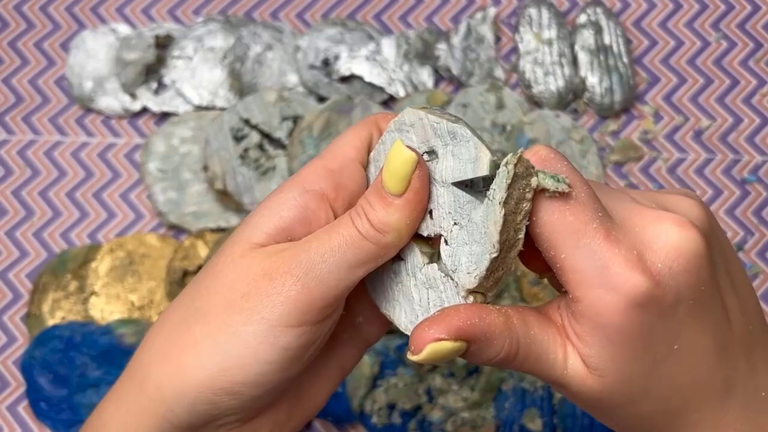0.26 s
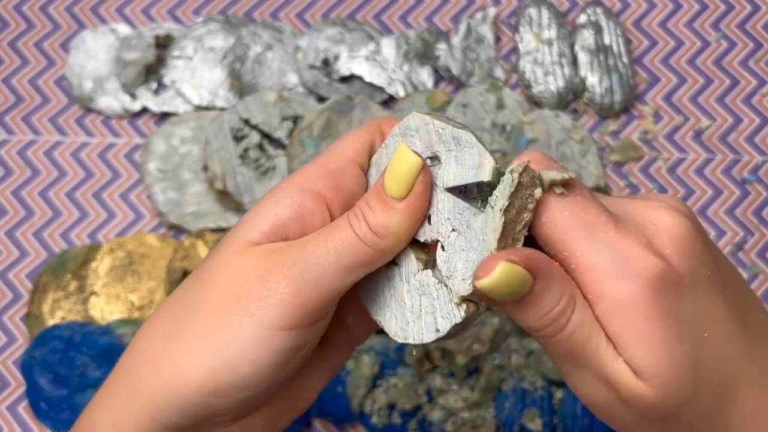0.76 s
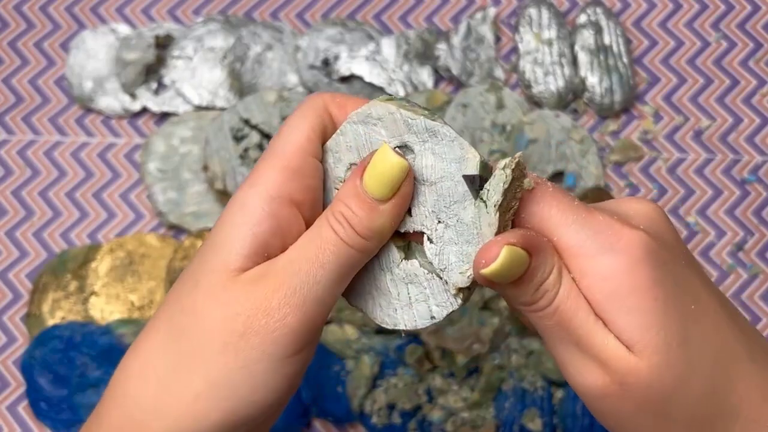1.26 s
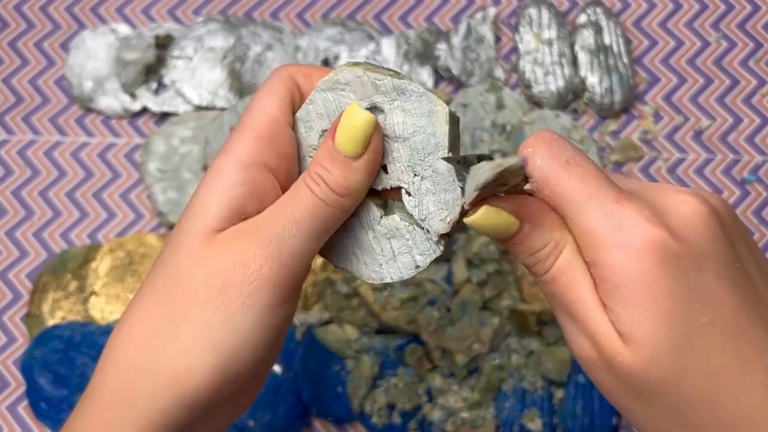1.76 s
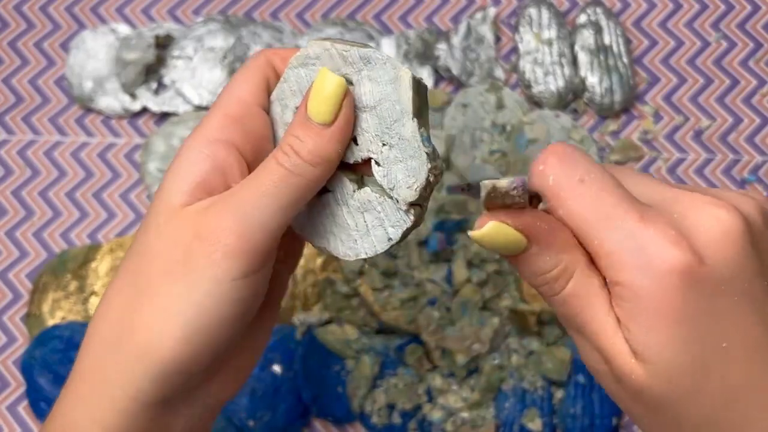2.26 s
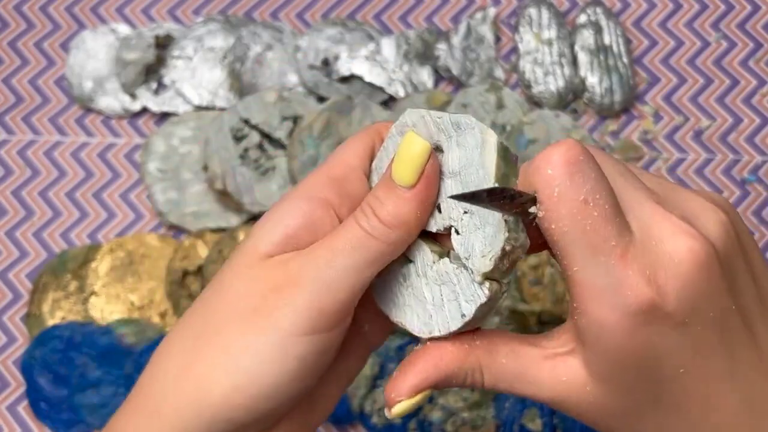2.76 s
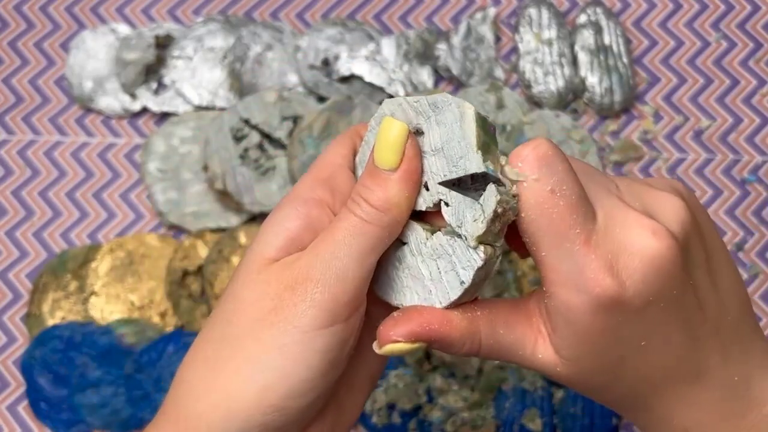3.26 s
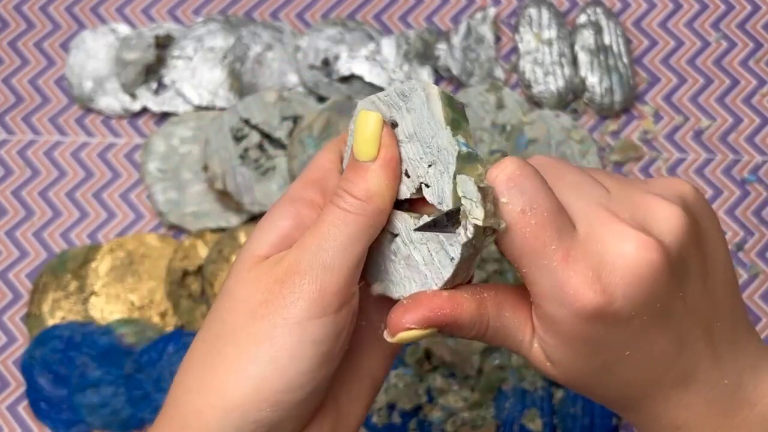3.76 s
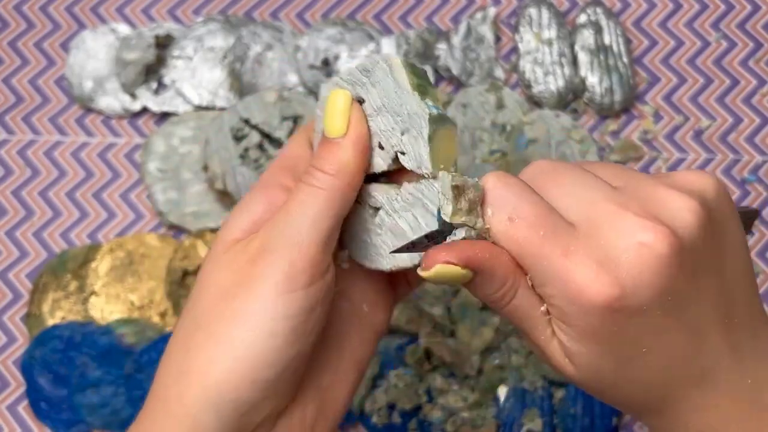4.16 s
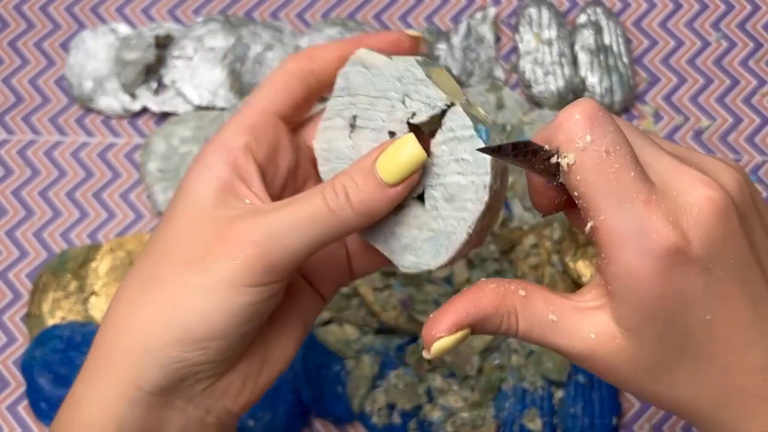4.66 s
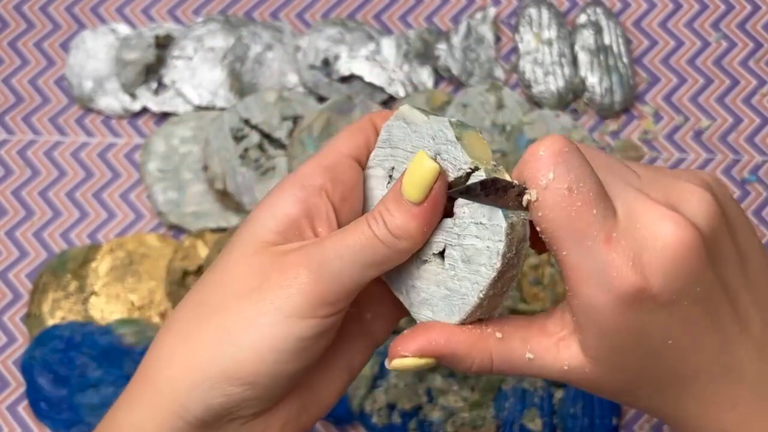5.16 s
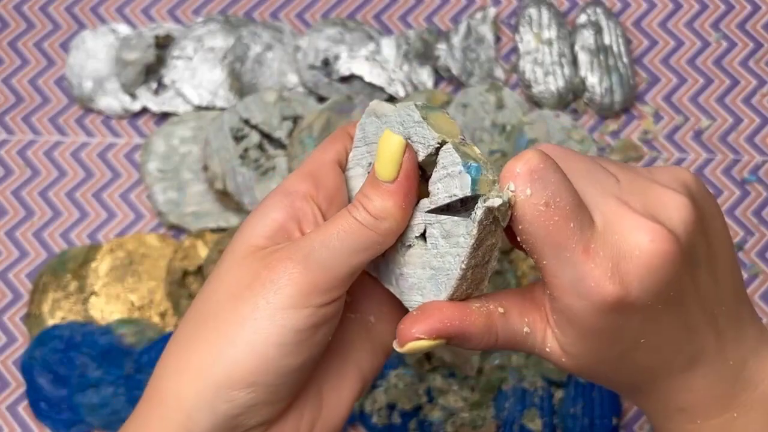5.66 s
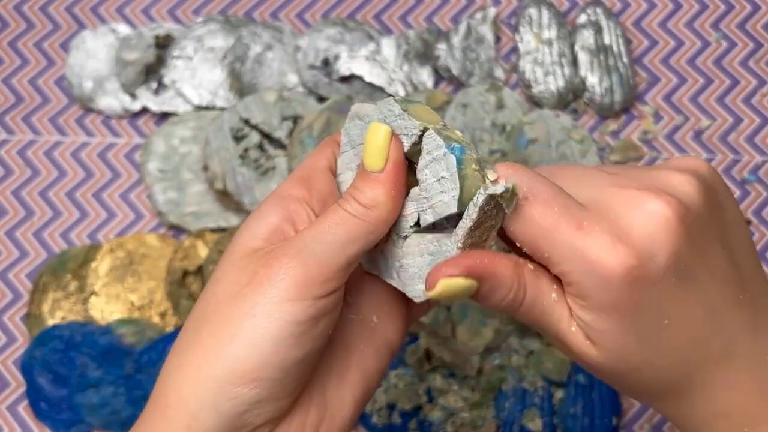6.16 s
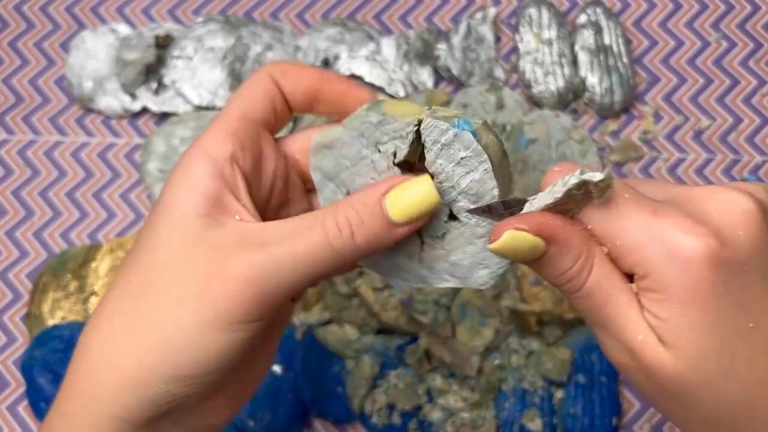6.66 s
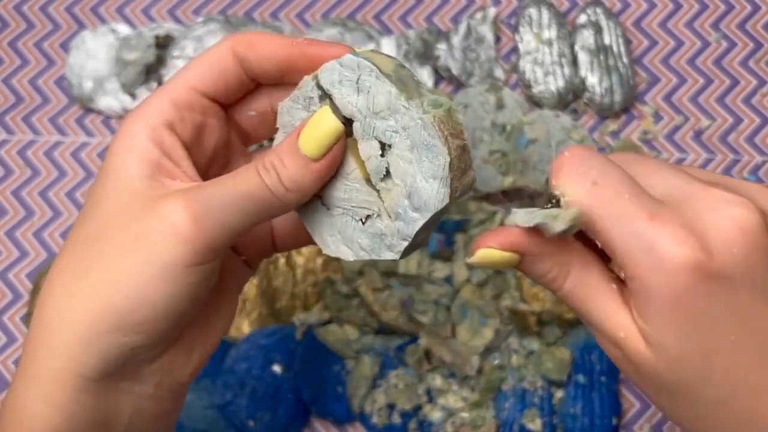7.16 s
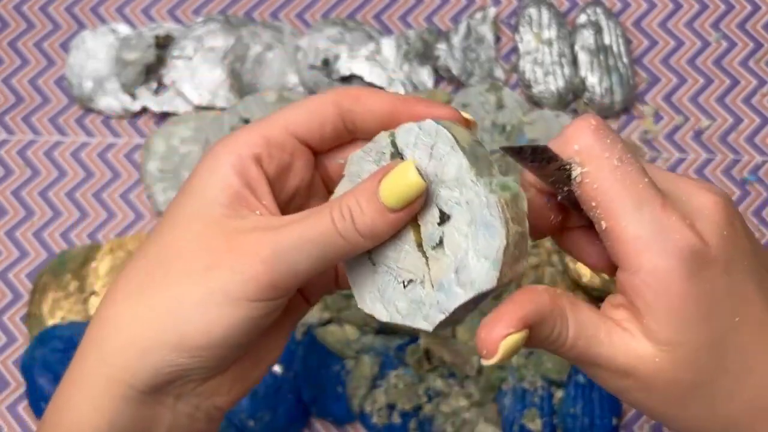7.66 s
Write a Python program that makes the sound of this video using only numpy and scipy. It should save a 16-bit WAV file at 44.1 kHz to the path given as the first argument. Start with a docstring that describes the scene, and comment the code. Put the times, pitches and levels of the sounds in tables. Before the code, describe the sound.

Close stereo pickup of a blade carving hard dry soap in a small room. A faint start, then a loud crisp snap, a run of small crackles and another hard crack with a knock. Ticks lead to the densest, loudest crunch past four seconds, then a calmer stretch, then more snaps and gritty crumbling. Faint low rumble and distant noise underneath.

```python
"""A small blade carves a hard dry bar of soap close to a stereo microphone pair in a small room.
The soap hisses under the blade (gritty filtered noise) and snaps as flakes break (ringing noise bursts);
chunks and hands knock on the table (bursts through its modes, rattles, thumps) and narrow rustles swell.
Distant traffic-like noise, table rumble, a low drone and two short low hums lie underneath."""
import sys
import numpy as np
from scipy import signal
from scipy.fft import rfft, irfft, next_fast_len
from scipy.io import wavfile
from scipy.ndimage import uniform_filter1d

SR = 44100
rng = np.random.default_rng(int(sys.argv[2]) if len(sys.argv) > 2 else 0)


def inscribe(sig):
    """Save sig as 16-bit PCM at rate SR to the path in sys.argv[1].

    A 1-D sig is mono; a 2-D sig holds one channel per row.
    Samples are clipped to [-1, 1] before scaling.
    """
    pcm = np.round(np.clip(np.atleast_2d(sig).T, -1, 1) * 32767)
    wavfile.write(sys.argv[1], SR, pcm.astype(np.int16))


N = 348257
LAG_MS = 1.5  # slow bending waves: a mode at 1 kHz arrives this late, lower ones later
STROKE_EDGE_DB = -13  # level at the ends of a stroke or rustle, relative to its middle


def rubbing():
    """A gritty hiss, a duller scrape and a fizz follow the strokes, partly with grains of their own."""
    # colour of the hiss under the blade (f/Hz, level/dB)
    hiss_colour = [(1500, -14), (2500, -7), (4300, 0), (5500, -2), (6200, -5), (7000, -10), (8000, -20),
                   (11800, -40)]
    # colour of the duller scrape (f/Hz, level/dB)
    scrape_colour = [(150, -10), (400, 5.5), (900, -0.5), (1500, -0.5), (2150, 0), (2700, 0.5), (3300, 0),
                     (6000, -28)]
    # colour of the fizz on top (f/Hz, level/dB)
    fizz_colour = [(5000, -47.5), (6500, 8.5), (7500, 11), (10500, 6.5), (11800, 4), (12400, -26.5)]
    crumb_share, crumb_full_db = .25, -42  # largest share of power in crumbs, reached at this level
    shared_grit, bits = grit(), crumbs()
    # each colour starts with a deep cut below its table
    colours = [(300, -26.0)] + hiss_colour, [(40, -38)] + scrape_colour, [(300, -87.5)] + fizz_colour
    out = 0
    for level, points in zip(strokes(), colours):
        noise = rng.standard_normal((2, N)) * (0.29 * shared_grit + 0.78 * grit())
        share = crumb_share * np.minimum(level / gain_of(crumb_full_db), 1)
        hiss = np.sqrt(1 - share) * evened(colour(noise, points))
        crumbling = np.sqrt(share) * evened(colour(bits, points))
        out = out + level * (hiss + crumbling)
    return out


def strokes():
    """Levels of hiss, scrape and fizz: showers start fast and fade, strokes swell and sink; powers add."""
    # hands at rest, always present (hiss/dB, scrape/dB, fizz/dB)
    rest_db = (-66.5, -61.5, -64)
    # crumbs showering after a break (t/s, level/dB, scrape re hiss/dB, fizz re hiss/dB)
    showers = [(1.20, -63.5, 14, 21), (1.431, -31, -18, -2.5), (1.70, -37, -12, 3), (1.852, -35.5, 9, -6.5),
               (2.643, -31, -2, -6), (3.249, -44.5, -4, -12), (3.477, -37, -13, -8),
               (3.629, -52.5, 9, -12.5), (3.745, -38, -11, -2.5), (3.97, -37, -22, -7),
               (4.247, -29, -15, 4), (4.275, -24.5, -27, -0.5), (4.40, -34.5, -13, 0),
               (4.664, -53.5, -13.5, 6.5), (5.34, -50, -3, -2), (5.506, -45.5, 3, 2.5),
               (5.746, -42.5, -0.5, 4.5), (6.043, -47.5, -10, -2), (6.32, -26.5, -11, -1.5),
               (6.639, -31.5, -15, 0.5), (6.97, -36.5, -0.5, -5), (7.522, -37, -0.5, -2), (7.72, -49, 2, 8)]
    # soft strokes of blade and fingers (middle t/s, length/s, level/dB, scrape re hiss/dB, fizz re hiss/dB)
    soft_strokes = [(0.0, 0.063, -57, -8, 8), (0.25, 0.12, -56, 1, 4), (0.627, 0.16, -42.5, -13, -2),
                    (0.756, 0.24, -51, -17, 0), (1.5, 0.06, -49, -20, -7), (0.95, 0.12, -62.5, -14, 12.5),
                    (1.784, 0.19, -36.5, -11.5, 1), (2.072, 0.16, -47.5, -3, 0),
                    (2.153, 0.42, -59, -8, -12), (2.258, 0.15, -68, -4, 14), (2.44, 0.034, -50, -4, 1),
                    (2.582, 0.41, -67, 8.5, 7), (2.969, 0.22, -48.5, -28, -4),
                    (3.889, 0.073, -44, -24, -10), (4.22, 0.36, -38.5, -12, -5.5),
                    (4.603, 0.2, -58, 7, -12), (4.977, 0.058, -51.5, -5.5, -5),
                    (5.286, 0.23, -53, -11, -0.5), (5.353, 0.043, -40.5, -9, -12),
                    (6.284, 0.26, -46, -12, 1.5), (6.6, 0.17, -33, -14.5, -2.5),
                    (6.927, 0.11, -42.5, -28, 4), (6.964, 0.066, -30.5, -11, 0),
                    (7.257, 0.12, -53, -18, 5.5), (7.465, 0.34, -63.5, 0, 5), (7.864, 0.24, -47, -4, 2)]
    rise_s = 0.004
    # a shower of big_db fades at this rate; each dB smaller fades faster
    fade_db_per_s, faster_per_db, big_db = 76.5, 2, -22
    t = np.arange(0, N + 64, 64) / SR  # coarse time steps
    power = gain_of(np.array(rest_db))[:, None] ** 2 * np.ones(len(t))
    for s, db, low_db, top_db in showers:
        after = np.maximum(t - s, 0)
        fade = max(fade_db_per_s + faster_per_db * (big_db - db), 10)
        shape = np.minimum(after / rise_s, 1) * gain_of(db - fade * after)
        power += (gain_of([[0], [low_db], [top_db]]) * shape) ** 2
    for s, length, db, low_db, top_db in soft_strokes:
        shape = gain_of(db + STROKE_EDGE_DB * (2 * (t - s) / length) ** 2)
        power += (gain_of([[0], [low_db], [top_db]]) * shape) ** 2
    return [np.interp(np.arange(N) / SR, t, np.sqrt(p)) for p in power]


def grit():
    """Grains of equal size, each crumbling for several milliseconds, over a steady contact."""
    grains_per_s, grit_db, crumble_s = 220, 9.5, 0.012
    starts = 1.0 * (rng.random(N) < grains_per_s / SR)
    grains = signal.lfilter([1], [1, -np.exp(-1 / (crumble_s * SR))], starts)
    return 1 + gain_of(grit_db) * evened(grains)


def crumbs():
    """Single crumbs breaking: short grains of sixteen pitches, slightly uneven, higher ones stronger."""
    per_s, spread_db, cycles = 1300, 0.5, 9.5
    out, pitches = np.zeros((2, N)), np.geomspace(300, 11500, num=16)
    size = gain_of(spread_db * np.minimum(rng.exponential(1, N), 3))
    size = size * (rng.random(N) < per_s / SR)
    which, sign = rng.integers(0, len(pitches), N), rng.choice([-1., 1.], (2, N))
    for k, hz in enumerate(pitches):
        u = np.arange(0, cycles, hz / SR)  # time in cycles
        grain = np.sin(np.pi * u / cycles) ** 2 * np.sin(2 * np.pi * u) * hz / 1000
        out += signal.oaconvolve(sign * size * (which == k), grain[None], axes=1)[:, :N]
    return evened(out)


def snaps():
    """Flakes breaking: each crack rings its flake briefly and sprays top treble."""
    # flakes breaking (t/s, level/dB, flake ring f/Hz, top treble re ring/dB, crack time scale/ms)
    breaks = [(1.1977, -17, 2960, 11.5, 2.1), (1.425, 1, 3560, 5.5, 2), (1.4285, -5, 4850, 1.5, 2.6),
              (1.4355, -13, 4900, 9, 3.8), (1.647, -26.5, 4700, 9, 3.5), (1.662, -25, 5000, 31, 2.7),
              (1.6836, -22.5, 2000, 13, 2.7), (1.692, -20, 4500, 8, 3), (1.7014, -15.5, 5000, 3, 3.7),
              (1.7172, -15.5, 4330, -10, 1.4), (1.7399, -14, 4250, 3, 1.8), (1.75, -19, 5130, -3, 2.9),
              (1.76, -14, 5130, 18, 1.7), (1.7918, -14, 3540, -15, 1.3), (1.8085, -24, 4800, 6, 1.5),
              (1.845, -15, 2480, -8, 2.4), (2.101, -26, 2770, 12, 4.9), (2.334, -41.5, 3200, 0, 8.4),
              (2.436, -31, 4730, -27, 1.5), (2.637, -4.5, 3620, -8, 1.6), (2.6402, 0.5, 3620, -1.5, 0.83),
              (3.2433, -14.5, 4800, 7.5, 3.3), (3.4746, -17, 3580, 9, 2.9), (3.5134, -21, 4670, 4, 2.4),
              (3.582, -17.5, 5600, -1, 5.5), (3.626, -23.5, 4300, 3, 8.7), (3.6527, -24, 3150, -21, 4.6),
              (3.744, -17, 2900, 6.5, 2.5), (3.8008, -30.5, 4050, -28, 5.2), (3.8739, -24.5, 3835, 5, 2.9),
              (3.9697, -5, 3810, -41, 2.2), (4.017, -26, 3527, -22, 3), (4.0729, -11.5, 4670, 2.5, 0.9),
              (4.166, -21.5, 3720, 5, 2), (4.184, -20, 5000, 5, 2.4), (4.22, 7.5, 4220, -3, 0.77),
              (4.2254, -11, 4350, 11, 4.4), (4.2476, -0.5, 3900, -11, 2.8), (4.2525, 2, 4140, -25, 1.8),
              (4.271, -2.5, 5550, -8, 3.8), (4.2762, -11, 4060, -18, 4.4), (4.282, -14.5, 5250, -4.5, 1.5),
              (4.293, -9, 4740, -18, 3.7), (4.3303, -18, 4100, -20, 2.6), (4.3384, -1.5, 4960, 5.5, 1.1),
              (4.394, -2, 5320, -43, 2.35), (4.4263, -16.5, 4170, -29, 5.3), (4.475, -15.5, 5600, -9, 3.8),
              (4.659, -27, 5200, 6.5, 2.7), (5.3443, -27, 5100, 6, 6.1), (5.5041, -19.5, 5440, 6.5, 3.8),
              (5.5392, -22.5, 4600, 29, 3), (5.7459, -12.5, 4920, 4.5, 3.3), (6.049, -18.5, 4960, 8.5, 1.2),
              (6.173, -29.5, 5000, 16.5, 1.8), (6.2944, -13.5, 3670, 3.5, 1.8), (6.31, -16, 4640, 5, 5.6),
              (6.3206, -12, 4970, 21, 2.7), (6.324, -13, 5130, -11, 2.7), (6.343, -26, 5000, -8, 3.4),
              (6.39, -21, 4900, 2, 6), (6.429, -24, 4050, -10, 3), (6.531, -30, 4160, -10, 2.2),
              (6.5523, -17, 5000, 4, 2), (6.6348, -6.5, 3770, 0, 0.91), (6.638, -17, 4700, -5, 3),
              (6.669, -16.5, 4730, 2.5, 3.8), (6.677, -29, 3500, 9, 1.4), (6.794, -28, 5070, 8, 4.9),
              (6.919, -20, 5000, 6, 3.6), (6.9586, -19.5, 2850, 4, 7.5), (7.452, -32.5, 5700, -28, 7.3),
              (7.5274, -21.5, 3450, 6, 9.8), (7.25, -40, 3500, -8, 6.6), (7.6226, -26, 2960, 2, 4),
              (7.681, -33, 2550, 10, 2.6), (7.7198, -6, 5380, -22, 2.3), (7.781, -14, 5730, -37, 3.9),
              (7.787, -34, 4530, -10, 2.7), (7.8507, -26.5, 4000, -24, 3.3)]
    out, top = np.zeros((2, N)), signal.butter(2, 6000, "high", fs=SR, output="sos")
    for s, db, hz, top_db, length_ms in breaks:
        crack = burst(length_ms)
        own_ring = evened(ring(ring(crack, hz, 1100.0), hz, 1600.0))
        broad_ring = evened(ring(ring(crack, 4800.0, 5600.0), 4800.0, 5600.0))
        flake = own_ring + 1.03 * broad_ring
        spray = evened(ring(signal.sosfilt(top, crack), 7300.0, 6400.0))
        snap = evened(flake) + 0.78 * gain_of(top_db) * spray
        add(out, s - .001, sized(snap, db, length_ms))
    return out


def burst(length_ms, size=4096):
    """A cluster of tiny fractures: lumpy noise, a sharp first break and a slower run of after-cracks."""
    t = np.arange(size) / SR * 1000 / max(length_ms, .3)  # in units of the time scale
    lumps = gain_of(1.8 * evened(uniform_filter1d(rng.standard_normal(size), size=30)))
    fall = np.exp(-t / 0.53) + 0.14 * np.exp(-t / 1.75)
    return rng.standard_normal((2, size)) * lumps * (1 - np.exp(-t / 0.96)) ** 2 * fall


def sized(x, db, length_ms):
    """Scales a burst to the energy that goes with its level and time scale."""
    energy = (x ** 2).sum(1, keepdims=True)
    return gain_of(db) * x * np.sqrt(0.33 * length_ms * SR / 1000 / energy)


def knocks():
    """Each blow rings the table, loose chips rattle on, and the board thumps."""
    # blows that reach the bar and the table (t/s, level/dB, body f/Hz, time scale/ms, rattle re blow/dB,
    # rattle f/Hz, thump level/dB, thump f/Hz, thump peak delay/ms, falling wave level/dB)
    blows = [(1.198, -22, 1300, 2.9, -16, 1380, -46, 164, 20, -32.5),
             (1.427, -12, 528, 2.17, -47, 520, -20, 83, 23.6, -29.5),
             (1.8454, -13, 500, 2.05, -30, 700, -39, 72.7, 27, -35),
             (2.433, -33.5, 910, 1.8, -32, 910, -46, 68, 22, -67),
             (2.638, -1.5, 1475, 2.5, -31, 1700, -17.5, 90.5, 15.6, -19),
             (2.646, -8.5, 660, 5.3, -40, 1800, -50, 88, 12, -43),
             (3.242, -35, 1190, 2.4, -36, 1150, -30.5, 87.7, 33.6, -33),
             (3.968, -32.5, 996, 9.4, -13, 996, -29.5, 69.5, 28, -33),
             (4.247, -19.5, 990, 5.4, -9.5, 1070, -53, 86, 19, -57),
             (4.275, -19, 800, 3.7, -15.5, 813, -56.5, 81, 10, -44.5),
             (4.472, -12.5, 1210, 3.2, -32, 1040, -27, 109, 18.6, -22),
             (4.482, -13, 1060, 1.6, -29, 1040, -30.5, 159, 10.7, -34),
             (4.661, -19, 1285, 1.2, -24, 1340, -29, 199, 15, -29.5),
             (5.504, -48, 790, 4.6, -21.5, 436, -39, 77, 34, -33),
             (5.744, -34, 2010, 3.2, -24, 2020, -34.5, 73, 22.2, -47),
             (6.319, -16.5, 435, 3.8, -37, 437, -41, 144, 18, -49),
             (6.624, -31.5, 400, 5.7, -28, 500, -30, 151, 6.4, -47),
             (6.632, -26, 1500, 3.3, -29, 1500, -28.5, 63, 24, -54),
             (6.672, -30, 495, 6.8, -22, 460, -33, 49.4, 25, -44),
             (6.9612, -25, 1500, 1.5, -8, 560, -57, 145, 17, -43),
             (7.531, -18, 1360, 1.5, -13, 600, -25, 154, 15, -36)]
    chips_per_s, chip_size = 520, 9.3  # loose chips in a rattle; size against the steady contact
    out, t = np.zeros((2, N)), np.arange(18000) / SR
    for s, db, hz, length_ms, rattle_db, rattle_hz, thump_db, thump_hz, late_ms, wave_db in blows:
        blow = table(burst(length_ms), hz, 28.0)
        add(out, s - .001 - LAG_MS / 1000, sized(blow, db, length_ms))

        hits = rng.random(len(t)) < chips_per_s / SR
        chips = rng.standard_normal((2, len(t))) * (1 + chip_size * hits)
        rattle = evened(table(chips, rattle_hz, 0.88))
        rattle_level = gain_of(db + rattle_db - 60 * t / 0.25) * (1 - np.exp(-t / 0.0089))
        add(out, s, rattle_level * rattle)

        # high bending waves of the board arrive first
        sweep = np.cumsum(150.0 + 422.0 * np.exp(-t / 0.01046)) / SR
        wave = (1 - np.exp(-t / 0.011)) * np.exp(-t / 0.032) * np.sin(2 * np.pi * sweep)
        # the whole board follows
        u = t * 1000 / max(late_ms, 2)
        swing = (u * np.exp(1 - u)) ** 4.5 * np.cos(2 * np.pi * thump_hz * (t - late_ms / 1000))
        thump = gain_of(thump_db) * swing + gain_of(wave_db) * wave
        add(out, s, np.array([thump, -thump]))
    return out


def table(force, hz, focus_db):
    """Rings the table modes, those near hz most (focus in dB an octave); each takes energy by its width."""
    # modes of bar and table top (f/Hz, width/Hz, level/dB)
    modes = [(310, 440, 11), (422.7, 230, 12), (660, 466, 9.5), (848, 460, 10), (1366, 85, -5),
             (1405, 140, 5), (1590, 100, -22.5), (1700, 170, 10), (1853, 130, -3), (2200, 390, -21)]
    out = 0
    for f, width, db in modes:
        mode = ring(ring(force, f, width), f, 3 * width)
        late = round(LAG_MS / np.sqrt(f / 1000) * SR / 1000)
        mode = np.pad(mode, ((0, 0), (late, 0)))[:, :force.shape[1]]
        share = np.sqrt(width / (mode ** 2).sum(1, keepdims=True))
        out = out + gain_of(db - focus_db * abs(np.log2(f / hz))) * share * mode
    return out


def rustles():
    """Gritty noise in one resonance that swells and sinks."""
    # narrow rustles (middle t/s, length/s, level/dB, centre f/Hz)
    swells = [(1.559, 0.2, -43.5, 2200), (1.933, 0.21, -47, 2100), (2.095, 0.31, -48.5, 2000),
              (2.232, 0.16, -57, 2030), (6.427, .2, -78, 2180), (7.08, 0.25, -58, 2110),
              (7.394, 0.1, -66.5, 2030), (7.489, 0.13, -48.5, 2000), (7.774, 0.076, -50, 2100)]
    width_hz = 450
    out, grains = np.zeros((2, N)), grit()
    for s, length, db, hz in swells:
        t = np.arange(-length, length, 1 / SR)
        band = ring(ring(rng.standard_normal((2, len(t))), hz, width_hz), hz, 2 * width_hz)
        add(out, s - length, evened(band) * gain_of(db + STROKE_EDGE_DB * (2 * t / length) ** 2))
    return out * evened(grains)


def room(x):
    """Dense reflections of the small room, each band dying at its own speed."""
    # reverberation of the room (f/Hz, time to fall 60 dB/s)
    decay = [(100, 0.97), (260, 0.46), (700, 0.4), (1840, 0.62), (4850, 0.52), (11000, 0.32)]
    taps = rng.standard_normal((2, SR))
    hz, t, z = signal.stft(taps, SR, nperseg=256)
    fall = gain_of(-60 * t / read(decay, hz)[:, None])
    tail = signal.istft(z * fall, SR, nperseg=256)[1]
    tail = tail * (1 - np.exp(-np.arange(tail.shape[1]) / (0.0013 * SR)))  # reflections build up
    return signal.fftconvolve(x, tail / np.linalg.norm(tail[0]), axes=1)[:, :N]


def rumble():
    """Low noise in the table follows the weight of the hands and swells sharply around each jolt."""
    # the hands jolt the table (t/s, level/dB)
    jolts = [(0.0, -52), (1.24, -44), (1.47, -35), (1.6, -55), (1.781, -52), (2.24, -49), (2.681, -28),
             (2.86, -54), (3.289, -48), (3.572, -37), (4.019, -37.5), (4.51, -34), (6.36, -44),
             (6.68, -41.5), (7.51, -47), (7.63, -42.5), (7.88, -47)]
    # weight of the hands on the table (t/s, level/dB)
    grip = [(0.0, -61), (2.0, -49), (3.0, -56.5), (3.1, -46), (4.4, -49), (4.8, -64), (5.4, -87),
            (5.5, -59.5), (6.3, -51), (6.8, -47.5), (7.45, -49.5), (7.9, -63)]
    # colour of the rumble (f/Hz, level/dB)
    low_colour = [(20, -46), (45, 8), (80, 7), (160, -4), (260, -6.5), (500, -71)]
    rise_db_per_s, fall_db_per_s = 221.5, 144
    t = np.arange(0, N + 64, 64) / SR  # coarse time steps
    power = gain_of(np.interp(t, *np.transpose(grip))) ** 2
    for s, db in jolts:
        slope = np.where(t < s, rise_db_per_s, fall_db_per_s)
        power += gain_of(db - slope * abs(t - s)) ** 2
    level = np.interp(np.arange(N) / SR, t, np.sqrt(power))
    return level * evened(colour(rng.standard_normal((2, N)), low_colour))


def background():
    """Steady distant noise with the rumble and the low tones on it."""
    # colour of the distant noise (f/Hz, relative density/dB)
    far_colour = [(15, -14.5), (25, -30), (49, 4), (69, 3), (210, -7), (262, -11), (665, -17), (948, -2.5),
                  (1320, -9), (1540, -8.5), (2010, -32), (2410, -42.5), (3140, -71.5), (3590, -49),
                  (5000, -20.5), (6500, -88), (11000, -120)]
    # path of the low drone (t/s, f/Hz, level/dB)
    drone = [(1.75, 66.4, -60), (1.84, 66, -59), (2.18, 67.9, -37), (2.66, 65.84, -42.5),
             (2.97, 70.36, -49.5), (3.68, 68.6, -41.5), (4.01, 67.6, -38.5), (4.15, 70, -92)]
    # paths of the two short low hums, one list each (t/s, f/Hz, level/dB)
    hums = [
        [(5.55, 149.6, -61), (5.584, 145.5, -65), (5.698, 155.3, -50.5), (5.794, 152.6, -44), (5.9, 152, -55)],
        [(6.85, 151, -55), (7.03, 157.7, -41), (7.162, 155.3, -46.5), (7.184, 155, -50), (7.3, 158, -66)],
    ]
    far_db = -47.5
    out = gain_of(far_db) * evened(colour(rng.standard_normal((2, N)), far_colour)) + rumble()
    for rows in [drone] + hums:
        add(out, *tone(rows))
    return out


def tone(rows):
    """A low sine on a path of pitch and level, slightly wavering in level, that fades in and out."""
    s, hz, db = np.transpose(rows)
    t = np.arange(s[0], s[-1], 1 / SR)
    slow_noise = uniform_filter1d(uniform_filter1d(rng.standard_normal(len(t)), size=2000), size=2000)
    wave = np.sqrt(2) * np.sin(2 * np.pi * np.cumsum(np.interp(t, s, hz)) / SR)
    wave *= gain_of(1.5 * evened(slow_noise))
    wave *= gain_of(np.interp(t, s, db)) * signal.windows.tukey(len(t), .1)
    return s[0], np.array([[1], [-1]]) * wave  # opposite in the two paths


def gain_of(db):
    """Decibels to gain."""
    return 10 ** (np.asarray(db) / 20)


def evened(x):
    """Scales to rms 1."""
    return x / np.sqrt(np.mean(x ** 2) + 1e-20)


def read(points, hz):
    """Reads a table on a log-frequency axis."""
    f, value = np.transpose(points)
    return np.interp(np.log(hz + 1), np.log(f + 1), value)


def add(mix, s, sound):
    """Mixes a two-path sound in at time s."""
    part = mix[:, max(round(s * SR), 0):][:, :sound.shape[1]]
    part += sound[:, :part.shape[1]]


def colour(x, points):
    """Filters by a table of (f/Hz, level/dB)."""
    size = next_fast_len(x.shape[1])
    gain = gain_of(read(points, np.fft.rfftfreq(size, 1 / SR)))
    return irfft(rfft(x, size) * gain, size)[:, :x.shape[1]]


def ring(x, hz, width):
    """A resonance of gain 1 at its centre."""
    return signal.lfilter(*signal.iirpeak(hz, hz / width, SR), x)


def scene():
    """Two paths of the same sound field; snaps and knocks also excite the room."""
    room_db = -10.5
    near = snaps() + knocks()
    return near + gain_of(room_db) * room(near) + rubbing() + rustles() + background()


def record(dry):
    """The pair blends the two paths by likeness and turns left against right; colour, clipping, band limit."""
    # the microphone pair (f/Hz, phase by which left leads/rad, left-right likeness/0-1)
    pair_phase = [(0, 0.0, 1.0), (160, -.06, .99), (350, -.4, .6), (600, -.9, .38), (950, -.75, .75),
                  (1400, -.4, .78), (1750, 0.0, .9), (2200, 1.5, .55), (2520, 2.4, .6), (2740, 3.1, .93),
                  (2950, 2.4, .55), (3300, 1.5, .55), (3900, .8, .62), (4500, 1.9, .6), (4950, 1.4, .6),
                  (5350, 2.3, .7), (5650, 3.12, .96), (6250, 3.16, .97), (6650, 3.55, .75),
                  (6950, 4.8, .45), (7550, 6.22, .95), (8400, 6.3, .97), (9050, 7.5, .5), (9750, 9.38, .93),
                  (10700, 9.44, .96), (11400, 10.6, .5), (11900, 12.5, .9), (16000, 12.6, .8)]
    # colour of the microphone (f/Hz, level/dB)
    mic_colour = [(2200, 0), (2500, -0.5), (2750, 1.5), (3000, -4), (3300, -4.5), (11400, -4), (11900, -20),
                  (12400, -24), (13000, -50.5), (14500, -58), (16000, -50)]
    # level of left over right (f/Hz, level/dB)
    left_louder = [(120, 0.5), (200, 1.5), (400, 2), (1500, 1.5), (2500, 0.5), (4500, -0.5), (6000, -0.5)]
    edge_hz = 16500
    size = next_fast_len(N + 4096)
    f, lead, same = np.transpose(pair_phase)
    hz = np.fft.rfftfreq(size, 1 / SR)
    half = np.arccos(np.clip(np.interp(hz, f, same), 0, 1)) / 2  # blend angle
    a, b = rfft(dry, size) * gain_of(read(mic_colour, hz))
    # each side takes half of the phase lead and half of the level difference
    turn = np.exp(.5j * np.interp(hz, f, lead)) * gain_of(.5 * read(left_louder, hz))
    left = turn * (np.cos(half) * a + np.sin(half) * b)
    right = (np.cos(half) * a - np.sin(half) * b) / turn
    clipped = np.clip(irfft(np.array([left, right]), size)[:, :N], -1, 1)
    band_limit = signal.firwin(511, edge_hz, window=("kaiser", 9), fs=SR)
    return signal.oaconvolve(clipped, band_limit[None], "same")


dry = scene()
out = record(dry)
inscribe(out)
```